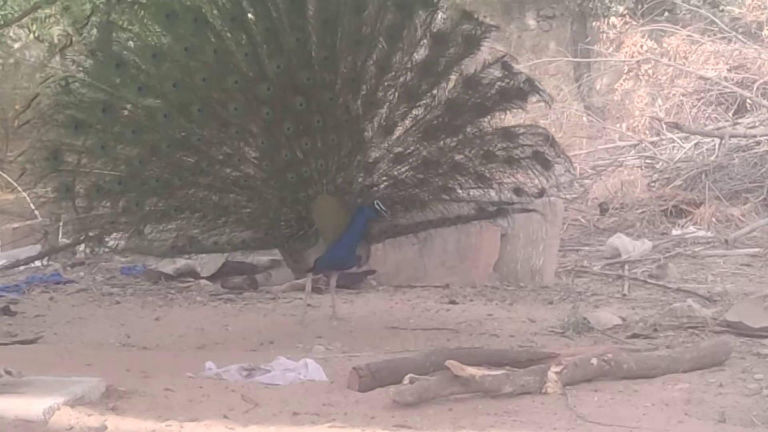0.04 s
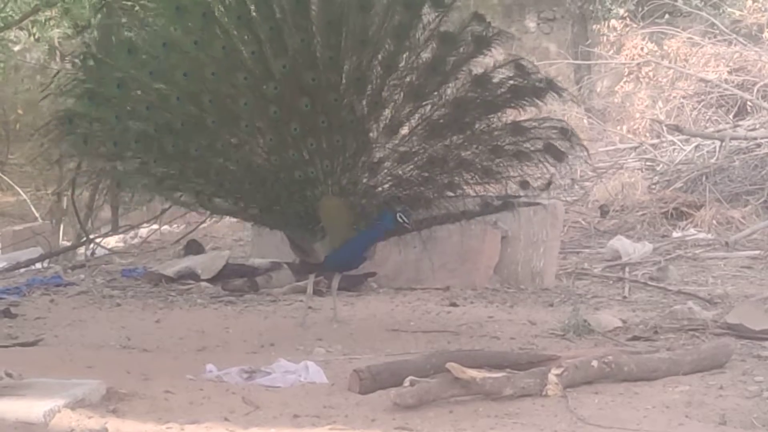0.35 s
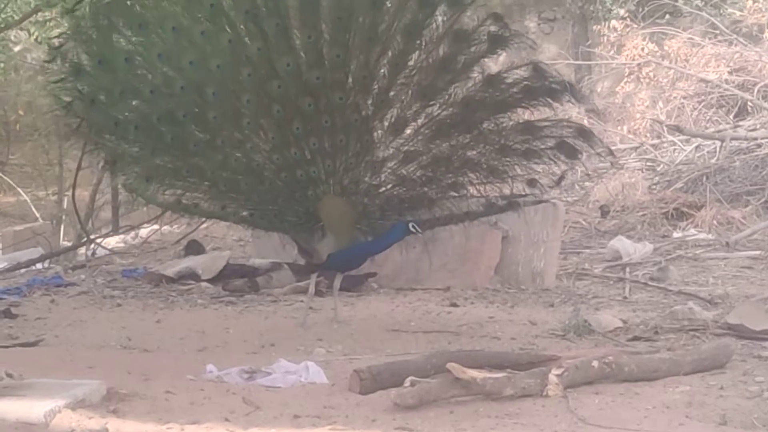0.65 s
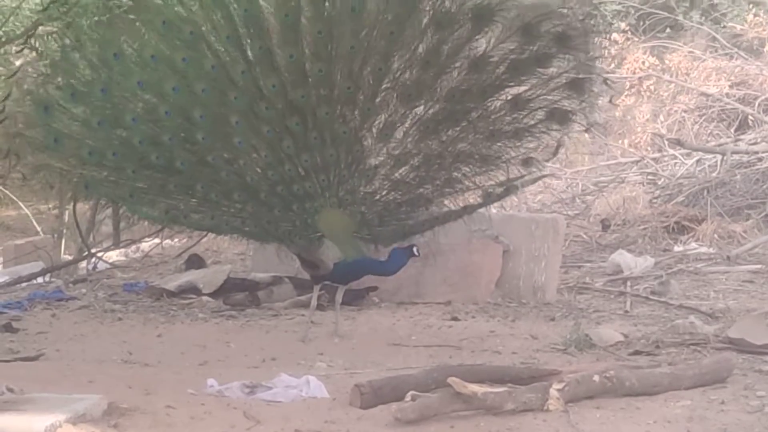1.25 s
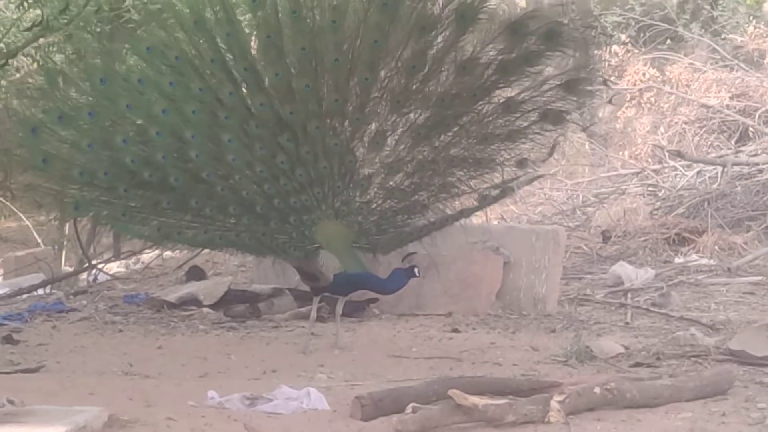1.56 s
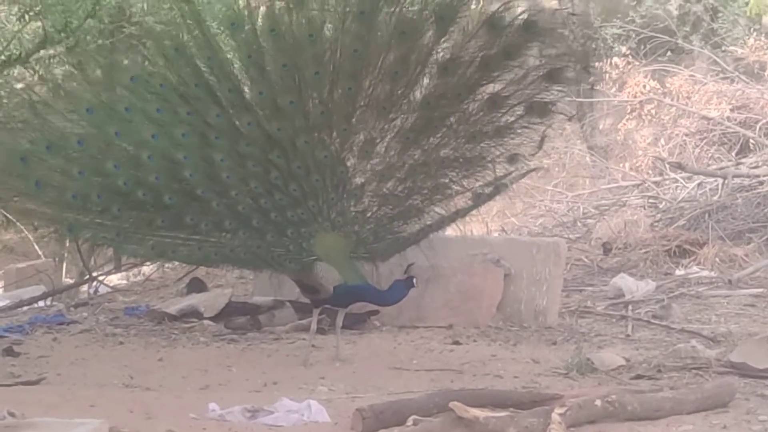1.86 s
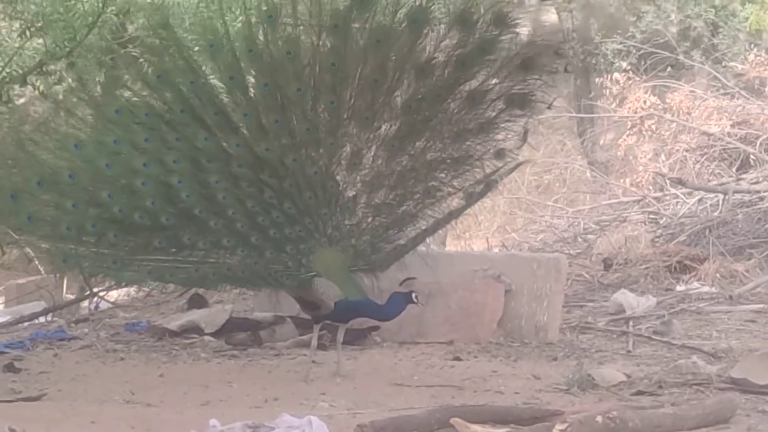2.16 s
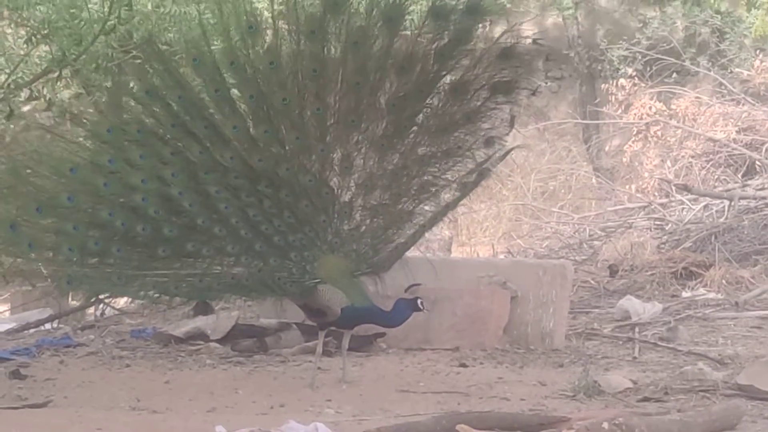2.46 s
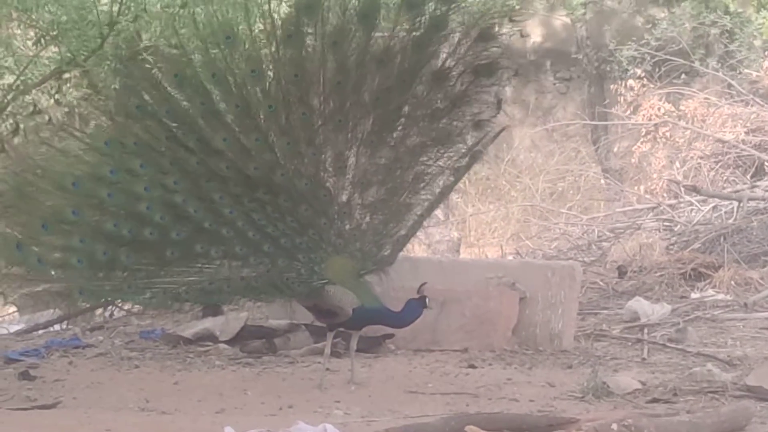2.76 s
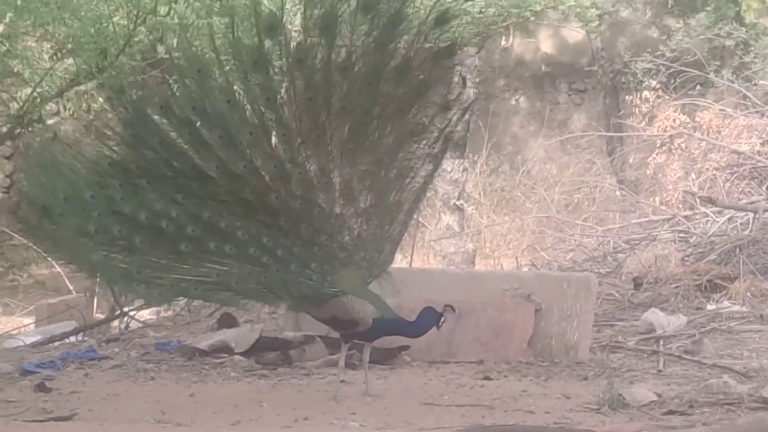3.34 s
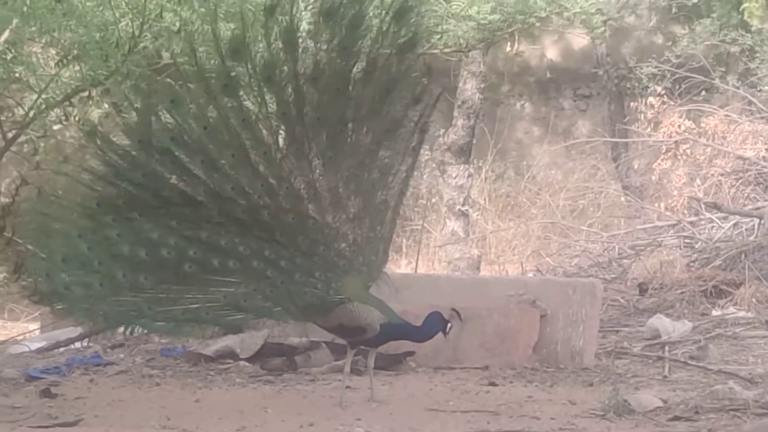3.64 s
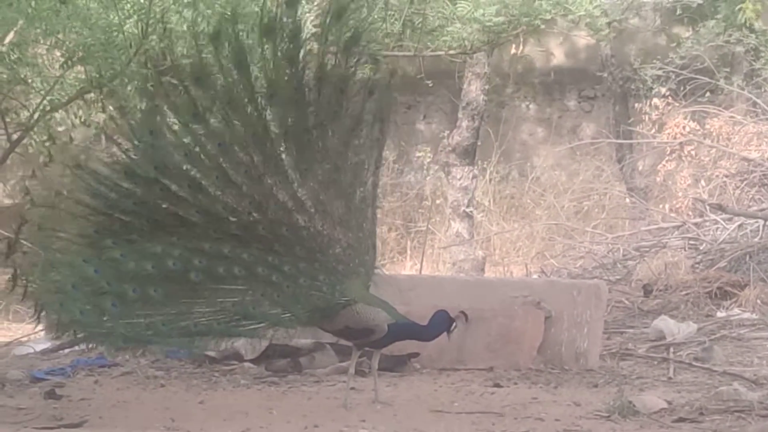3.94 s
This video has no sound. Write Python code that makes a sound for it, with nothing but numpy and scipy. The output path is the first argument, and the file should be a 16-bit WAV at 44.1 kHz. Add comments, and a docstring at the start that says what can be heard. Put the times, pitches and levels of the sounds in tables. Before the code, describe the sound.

A nearby crow caws harshly twice, at the start and at about 0.9 seconds. Two sharp chirps and a whistle cross the first caw, while wind puffs lightly on the microphone. From 1.5 to 4 seconds a small bird alternates falling notes and high chirps, with faint peeps and distant crows answering. A low outdoor hum continues throughout, with a faint rustle and soft bump near 3.5 seconds.

```python
"""Over a low outdoor hum, wind puffs on the right microphone and a near crow caws twice, harshly:
uneven pulses ring its throat as the beak opens. Two zips and a whistle cross the first caw; faint dry
rustles follow. From 1.5 s a small bird see-saws between slurs and chips, far crows answer and a second
bird peeps. The hum swells at 2.3 s; a last whistle and a soft bump come near 3.5 s.
The trees scatter every call."""
import sys
import numpy as np
from scipy import signal
from scipy.fft import rfft, irfft
from scipy.io import wavfile
from scipy.ndimage import uniform_filter1d

SR = 44100
rng = np.random.default_rng(int(sys.argv[2]) if len(sys.argv) > 2 else 0)


def unload_audio(sound):
    """Save the sound as a 16-bit wav file, at the path given as the first command line argument."""
    columns = np.transpose(np.atleast_2d(sound))
    # keep every value between -1 and 1, then stretch to whole-number steps
    steps = np.round(np.clip(columns, -1, 1) * 32767)
    wavfile.write(sys.argv[1], SR, steps.astype(np.int16))


N = 176400
TIME_S = np.arange(N) / SR
LOW_RESONANCE_HZ = 815  # near crow's throat, before tuning


def amp(db):
    """dB to gain."""
    return 10 ** (np.asarray(db) / 20)


def unit(x):
    """Scale to rms 1."""
    return x / np.sqrt(np.mean(x ** 2) + 1e-20)


def read(points, hz):
    """Interpolate a table over log frequency."""
    knots_hz, value = np.transpose(points)
    return np.interp(np.log(hz + 1), np.log(knots_hz + 1), value)


def colour(x, points):
    """Filter by a (frequency [Hz], gain [dB]) table."""
    hz = np.fft.rfftfreq(x.shape[-1], 1 / SR)
    return irfft(rfft(x) * amp(read(points, hz)), x.shape[-1])


def pan(db):
    """Stereo gains for a left-minus-right level."""
    return amp(np.array([[db], [-db]]) / 2)


def add(mix, start_s, sound):
    """Mix in place from start_s."""
    part = mix[..., max(round(start_s * SR), 0):][..., :sound.shape[-1]]
    part += sound[..., :part.shape[-1]]


def bell(centre_s, sigma_s, peak_db):
    """Gaussian envelope."""
    return amp(peak_db) * np.exp(-((TIME_S - centre_s) / sigma_s) ** 2 / 2)


def wobble(count, cutoff_hz):
    """Low-passed noise, rms about 1."""
    lowpass = signal.butter(2, cutoff_hz, fs=SR, output="sos")
    return unit(signal.sosfilt(lowpass, rng.standard_normal(SR)))[-count:]


def resonate(x, hz, width_hz):
    """Steep resonance tracking the curve hz."""
    carrier = np.exp(2j * np.pi * np.cumsum(hz) / SR)
    r = np.exp(-np.pi * width_hz / SR)
    return 2 * (carrier * signal.lfilter([(1 - r) ** 2], [1, -2 * r, r * r], x / carrier)).real


def scatter(x, t60s):
    """Sparse echoes, different per channel; each band decays at its own rate."""
    taps = rng.standard_normal((2, SR)) * (rng.random((2, SR)) < 1 / 20)
    taps[:, :SR // 500] = 0  # 2 ms gap
    hz, t, bands = signal.stft(taps, SR, nperseg=256)
    decay = amp(-60 * t / read(t60s, hz)[:, None])
    tail = signal.istft(bands * decay, SR, nperseg=256)[1]
    tail /= np.linalg.norm(tail, axis=1, keepdims=True)
    return signal.fftconvolve(x, tail, axes=1)[:, :N]


def outdoors(x, early_db, tail_db):
    """Direct sound, quick echoes off ground and wall, long tail from the trees."""
    # tree reverberation (frequency [Hz], T60 [s])
    trees = [(200, 0.64), (1800, 0.77), (3500, 1), (6000, 0.61), (12000, 0.67)]
    early_t60_s = 0.14
    return x + amp(early_db) * scatter(x, [(1000, early_t60_s)]) + amp(tail_db) * scatter(x, trees)


def air():
    """Steady outdoor hum and hiss; the lows are nearly alike in both channels."""
    # noise spectrum (frequency [Hz], relative density [dB])
    spectrum = [(20, -40), (86, -3), (188, -1), (359, -7), (1080, -10), (1240, -13), (3440, -16.5),
                (3930, -25.5), (4870, -18.5), (5430, -31), (6210, -23.5), (8580, -33), (10100, -35.5),
                (12200, -23), (15500, -33.5)]
    # left-right likeness (frequency [Hz], correlation [-1..1])
    likeness = [(130, 0.9), (380, 0.84), (950, -0.072), (2380, 0.21), (5980, -0.37), (15000, 0.092)]
    # stereo balance (frequency [Hz], left minus right [dB])
    balance = [(600, 0), (1400, -3), (3100, 0), (6800, -9), (9500, -6), (14000, -1.5)]
    hz = np.fft.rfftfreq(N, 1 / SR)
    same, tilt_db = read(likeness, hz), read(balance, hz) / 2
    left, independent = rfft(rng.standard_normal((2, N)))
    right = same * left + np.sqrt(1 - same ** 2) * independent
    stereo = np.array([left * amp(tilt_db), right * amp(-tilt_db)])
    return amp(-46) * unit(irfft(stereo * amp(read(spectrum, hz)), N))


def wind():
    """Low puffs buffet the right microphone."""
    # puffs (centre [s], sigma [s], level [dB])
    puffs = [(.12, 0.26, -38), (.31, 0.057, -37.5), (.56, 0.035, -37), (0.616, 0.03, -27.5),
             (0.736, 0.021, -40.5), (.845, 0.033, -35), (0.972, 0.022, -36.5), (1.43, 0.059, -42.5)]
    # buffeting spectrum (frequency [Hz], gain [dB])
    spectrum = [(20, -44), (76, 0.5), (135, -6.5), (250, -23), (2500, -82)]
    level = sum(bell(*puff) for puff in puffs)
    return unit(colour(rng.standard_normal((2, N)), spectrum)) * level * amp([[-20], [0]])


def caw(length_s, hz, flutter_hz, rise_s, opening_s, shut_tuning, open_tuning, throat):
    """Uneven, fluttering pulses and rasp ring a throat whose resonances rise as the beak opens."""
    sag, jitter, shimmer_db, rasp = .09, .028, 2.5, .45
    flutter_depth, flutter_swing, flutter_drift = .5, .085, .05
    closing_droop, release_s = .049, .059
    t = np.arange(0, length_s, 1 / SR)
    ends = (2 * t / length_s - 1) ** 4  # 1 at either end, 0 mid-call
    rate_hz = flutter_hz * (1 - sag * ends + flutter_drift * wobble(len(t), 40))
    flutter = np.cos(2 * np.pi * np.cumsum(rate_hz) / SR)
    pitch_hz = hz * (1 - sag * ends + flutter_swing * flutter + jitter * wobble(len(t), 200))
    cycles = np.floor(np.cumsum(pitch_hz) / SR)
    pulses = np.diff(cycles, prepend=0) * amp(shimmer_db * wobble(len(t), 200))
    drive = (unit(pulses) + rasp * rng.standard_normal(SR)[:len(t)]) * (1 + flutter_depth * flutter)
    closed = np.cos(np.pi / 2 * np.minimum(t / opening_s, 1))
    tuning = open_tuning + (shut_tuning - open_tuning) * closed - closing_droop * ends
    voice = sum((-1) ** k * amp(db + shut_db * closed) * resonate(drive, centre_hz * tuning, width_hz)
                for k, (centre_hz, width_hz, db, shut_db) in enumerate(throat))
    attack = np.sin(np.pi / 2 * np.minimum(t / rise_s, 1)) ** 1.3
    release = np.minimum((length_s - t) / release_s, 1)
    return unit(voice) * attack * release


def near_crow():
    """Two harsh caws, slightly earlier on the left, louder on the right."""
    # (start [s], length [s], level [dB], flutter [Hz], rise [s], beak opening [s], shut tuning [x])
    caws = [(0.029, .375, -27, 79.95, 0.11, 0.12, 0.903), (.868, .372, -27, 69.96, 0.15, 0.17, 0.93)]
    # resonances before tuning (centre [Hz], width [Hz], gain [dB], extra with beak shut [dB])
    throat = [(LOW_RESONANCE_HZ, 127, -2, -4), (1196, 428, -5, 2), (1650, 290, 4.5, 6),
              (1863, 310, 5.5, -2), (2061, 400, 7, 0.5), (3190, 250, -28.5, -1), (4380, 750, -16.5, 1),
              (6833, 2030, -19, -4), (11400, 2500, -33, 1)]
    pitch_hz, open_tuning, lag_s = 418, 0.97, .00021
    voice = np.zeros(N)
    for start_s, length_s, db, *gesture in caws:
        add(voice, start_s, amp(db) * caw(length_s, pitch_hz, *gesture, open_tuning, throat))
    delay = np.exp(-2j * np.pi * np.fft.rfftfreq(N, 1 / SR) * lag_s)
    late = irfft(rfft(voice) * delay, N)
    return outdoors(np.array([voice, late]) * pan(db=-3), early_db=-4, tail_db=-8)


def small_bird(notes, shape, octave_db, pan_db, early_db, tail_db, waver=.014, third_db=-np.inf):
    """Gliding notes of one shape: a wavering tone plus overtones, echoed outdoors."""
    song = np.zeros(N)
    position, pitch_ratio, shape_db = np.transpose(shape)
    for start_s, length_s, db, pitch_hz in notes:
        progress = np.linspace(0, 1, int(length_s * SR))
        drift = unit(uniform_filter1d(rng.standard_normal(SR // 2), size=90))[:len(progress)]
        hz = pitch_hz * np.interp(progress, position, pitch_ratio) * (1 + waver * drift)
        level = amp(db + np.interp(progress, position, shape_db))
        phase = 2 * np.pi * np.cumsum(hz) / SR
        tone = sum(amp(partial_db) * np.sin(k * phase) * (k * hz < SR / 2)
                   for k, partial_db in enumerate([0, octave_db, third_db], 1))
        add(song, start_s, level * signal.windows.tukey(len(tone), .1) * tone)
    return outdoors(song * pan(pan_db), early_db, tail_db)


def zips():
    """Two sharp upward bird sweeps."""
    # zips (start [s], length [s], level [dB], reference pitch [Hz])
    notes = [(.0615, .015, -22, 11480), (.1675, .013, -24, 11050)]
    # contour (position [0..1], pitch [x], gain [dB])
    shape = [(0, .355, -12), (.2, .385, 0), (.42, .44, -7), (.55, .69, -19), (.74, .87, -4), (1, 1.1, -13)]
    return small_bird(notes, shape, octave_db=-15, third_db=-15, waver=.025,
                      pan_db=-2.5, early_db=-3, tail_db=0)


def whistles():
    """Two rising, nearly pure bird whistles."""
    # whistles (start [s], length [s], level [dB], top pitch [Hz])
    notes = [(.312, .062, -40, 5670), (3.491, .088, -47, 5710)]
    # contour (position [0..1], pitch [x], gain [dB])
    shape = [(0, .73, -9), (.5, .825, 0), (.85, .95, 0), (1, 1, -10)]
    return small_bird(notes, shape, octave_db=-35, pan_db=-1, early_db=0, tail_db=-1)


def rustles():
    """Twigs and feathers: brief clumps over a faint steady crackle, to the left."""
    # clumps (start [s], level [dB])
    clumps = [(0.676, -61), (1.7, -59), (1.936, -65), (3.439, -51)]
    # crackle spectrum (frequency [Hz], gain [dB])
    spectrum = [(1500, -17), (4500, 12), (8000, -6), (10500, 5), (15000, -30)]
    decay_s, grains_per_s, floor_db = .018, 2500, -65.5
    level = sum(amp(db) * (TIME_S > s) * np.exp(-abs(TIME_S - s) / decay_s) for s, db in clumps)
    grains = rng.standard_normal((2, N)) * (rng.random(N) < grains_per_s / SR)
    return pan(db=10.5) * unit(colour(grains, spectrum)) * (level + amp(floor_db))


def slurs():
    """Falling notes of a small bird's see-saw song."""
    # slurs (start [s], level [dB])
    onsets = [(1.505, -47), (1.831, -45), (2.171, -43), (2.503, -43), (2.842, -44.5), (3.177, -45),
              (3.502, -44.5), (3.825, -45.5)]
    # contour (position [0..1], pitch [x], gain [dB])
    shape = [(0, 1, -11), (.2, .955, -5), (.38, .905, 0), (.6, .84, -8), (1, .72, -21)]
    length_s, top_hz = .112, 3600
    notes = [(start_s, length_s, db, top_hz) for start_s, db in onsets]
    return small_bird(notes, shape, octave_db=-40, waver=.03, pan_db=3, early_db=-7, tail_db=1)


def chips():
    """High rising notes of the see-saw song, one after each slur."""
    # chips (start [s], length [s], level [dB])
    onsets = [(1.657, 0.03, -35.5), (1.984, 0.026, -37.5), (2.316, 0.027, -37.5), (2.654, 0.024, -37.5),
              (2.984, 0.04, -40.5), (3.325, 0.037, -40.5), (3.638, 0.042, -41.5), (3.964, 0.031, -43.5)]
    # contour (position [0..1], pitch [x], gain [dB])
    shape = [(0, .84, -22), (.18, .92, -3), (.38, .975, 0), (.62, 1.005, -5), (1, .995, -19)]
    pitch_hz = 6258
    notes = [(*onset, pitch_hz) for onset in onsets]
    return small_bird(notes, shape, octave_db=-40, pan_db=-5, early_db=-8, tail_db=-4)


def far_crows():
    """Short dull caws, mostly echo."""
    # (start [s], length [s], level [dB], pitch [Hz], throat tuning [x])
    caws = [(1.688, .18, -56, 432.7, 0.99), (2.68, .18, -56.5, 490, 1.206), (3.561, .156, -45, 521, 1.01),
            (3.793, .21, -52, 456.4, 1.03)]
    # resonances before tuning (centre [Hz], width [Hz], gain [dB])
    resonances = [(1070, 440, -7.5), (1605, 210, 4.5), (1975, 700, -2.5)]
    throat = [(*row, 0) for row in resonances]
    voice = np.zeros(N)
    for start_s, length_s, db, hz, tuning in caws:
        call = caw(length_s, hz, flutter_hz=61.85, rise_s=0.038, opening_s=0.12,
                   shut_tuning=0.906 * tuning, open_tuning=tuning, throat=throat)
        add(voice, start_s, amp(db) * call)
    return outdoors(voice * pan(db=-1.5), early_db=-4.5, tail_db=5)


def peeps():
    """A second bird's falling notes, strongest an octave up."""
    # fundamentals (start [s], length [s], level [dB], reference pitch [Hz])
    notes = [(2.072, 0.048, -63, 2203), (2.272, 0.072, -58.5, 2107), (2.518, 0.0332, -55, 2000),
             (2.718, 0.069, -57, 2041), (2.965, 0.039, -58, 2007)]
    # contour (position [0..1], pitch [x], gain [dB])
    shape = [(0, .99, -5), (.4, .96, -7), (.7, .915, 1), (1, .84, -9)]
    return small_bird(notes, shape, octave_db=13, pan_db=-1.5, early_db=2.5, tail_db=0)


def swell():
    """One low swell of noise, like distant traffic."""
    # rumble spectrum (frequency [Hz], gain [dB])
    spectrum = [(40, -40), (85, -6.5), (135, -2.5), (1200, -50)]
    level = bell(centre_s=2.31, sigma_s=0.17, peak_db=-48.5)
    return unit(colour(rng.standard_normal(N), spectrum)) * level


def thump():
    """One soft low bump, to the right."""
    # bump spectrum (frequency [Hz], gain [dB])
    spectrum = [(30, -10), (130, 2), (700, -45)]
    level = bell(centre_s=3.55, sigma_s=0.01, peak_db=-40)
    return unit(colour(rng.standard_normal(N), spectrum)) * level * pan(db=-13)


def scene():
    """Small birds, background and crows, in stereo."""
    birds = chips() + slurs() + peeps() + whistles() + zips()
    background = air() + swell() + wind() + thump() + rustles()
    return birds + background + near_crow() + far_crows()


def record(dry):
    """Right microphone duller at the very top; then the recorder's band limit."""
    # microphone treble (frequency [Hz], gain [dB])
    left_top, right_top = [(7000, 0.66), (11000, 2.4)], [(7000, 0), (11000, -8)]
    edge_hz = 15600
    mics = np.array([colour(dry[0], left_top), colour(dry[1], right_top)])
    lowpass = signal.firwin(511, edge_hz, window=("kaiser", 9), fs=SR)
    return signal.oaconvolve(mics, lowpass[None], "same")


dry = scene()
out = record(dry)
unload_audio(out)
```